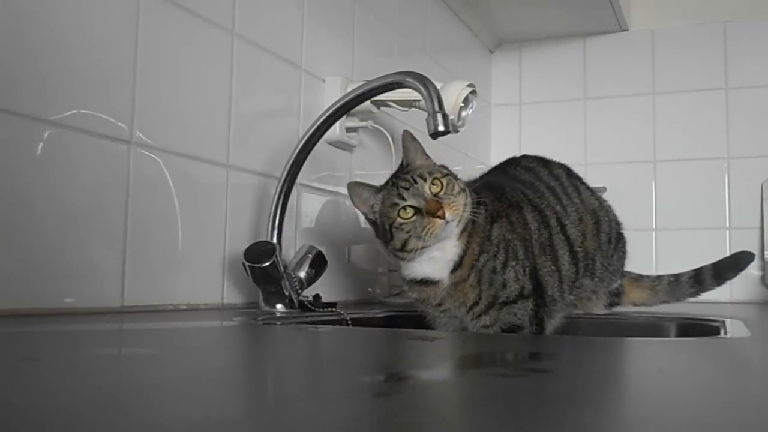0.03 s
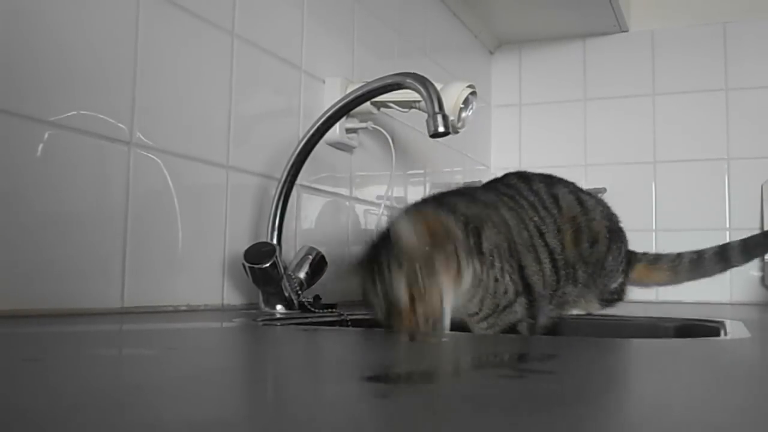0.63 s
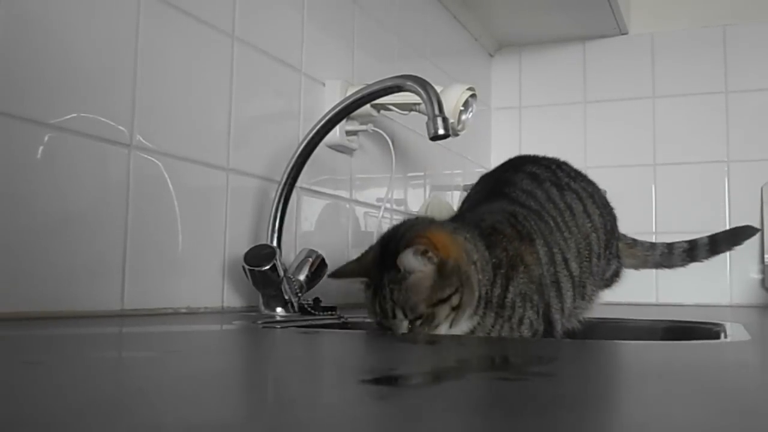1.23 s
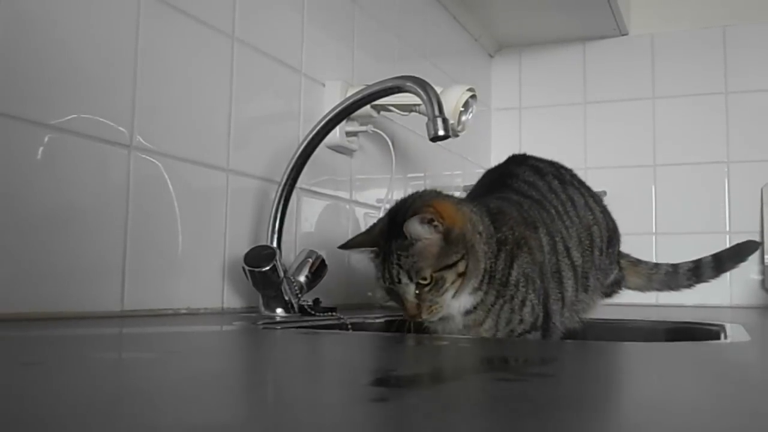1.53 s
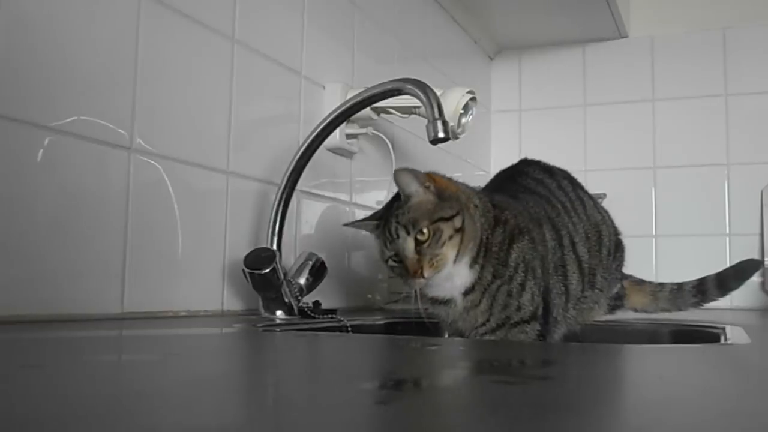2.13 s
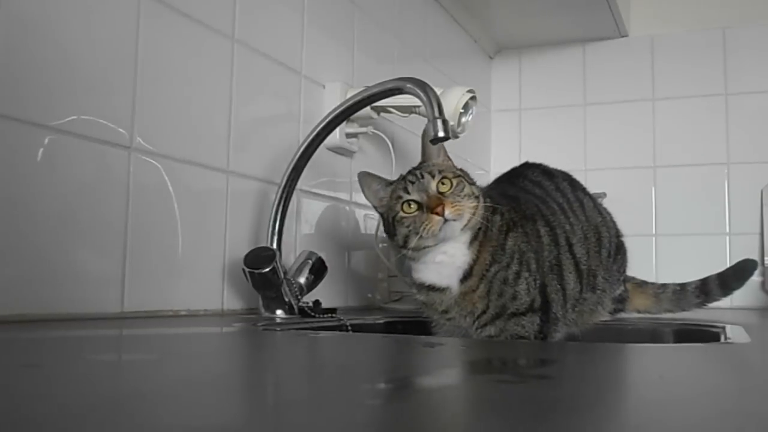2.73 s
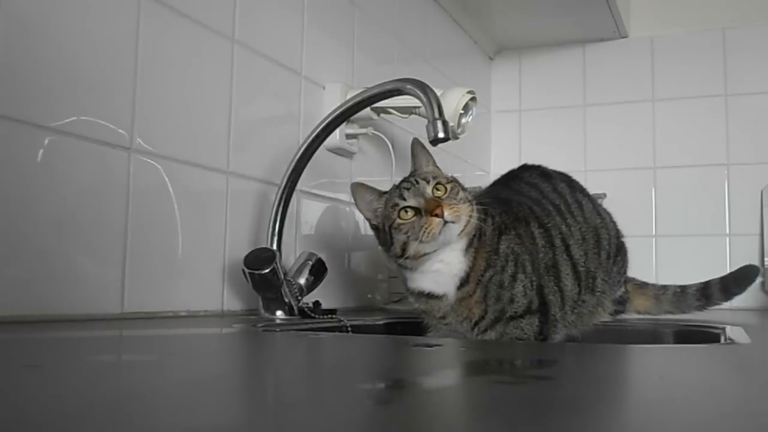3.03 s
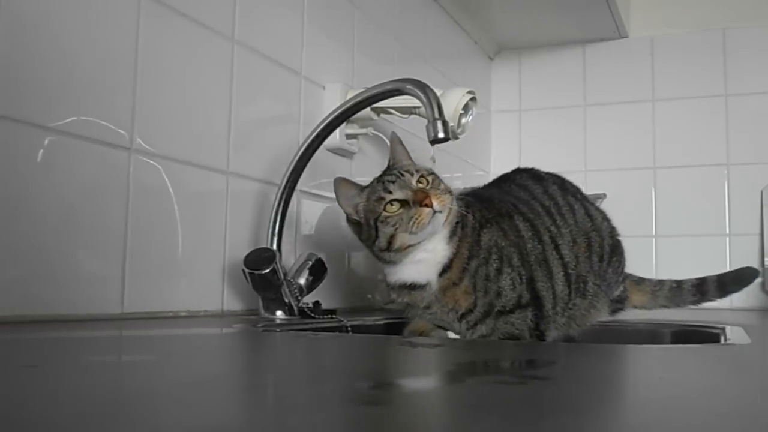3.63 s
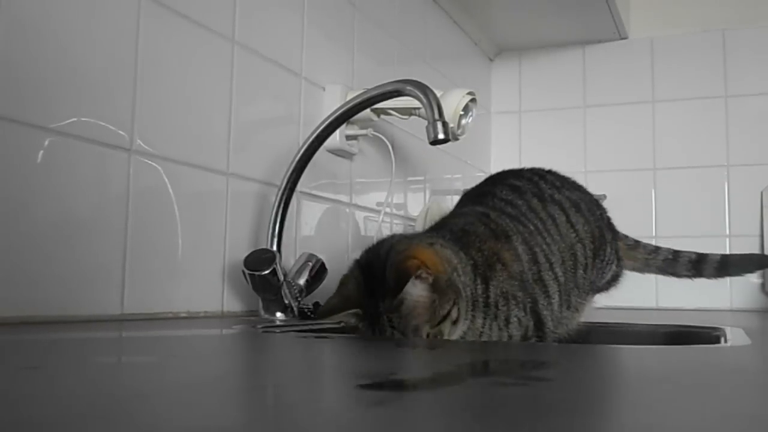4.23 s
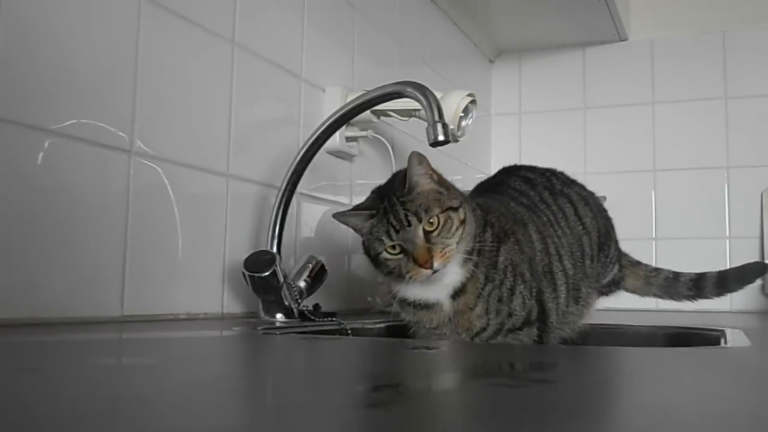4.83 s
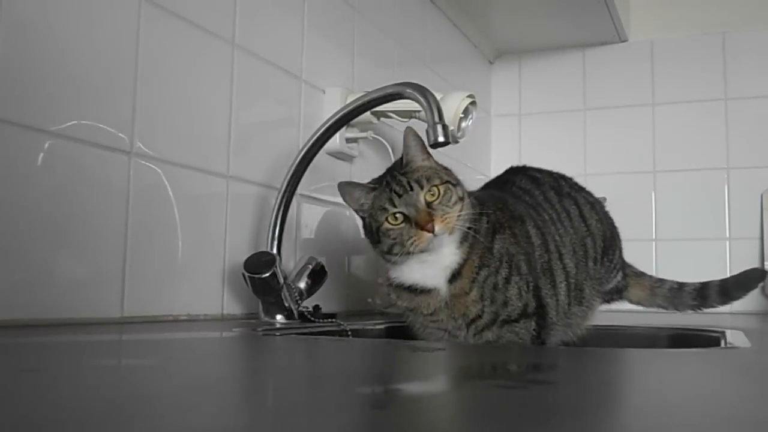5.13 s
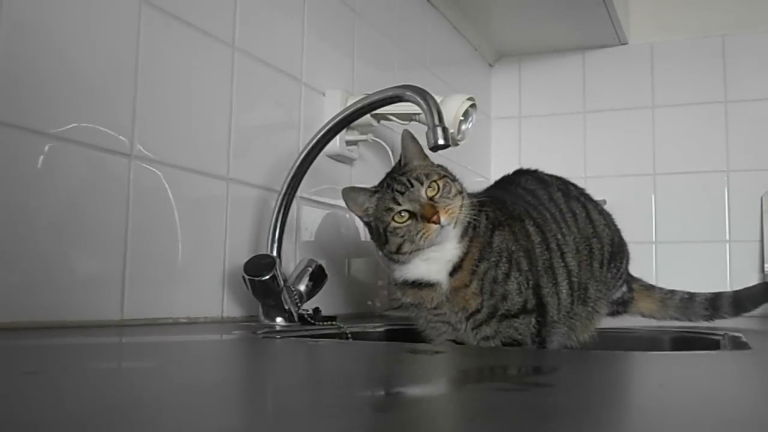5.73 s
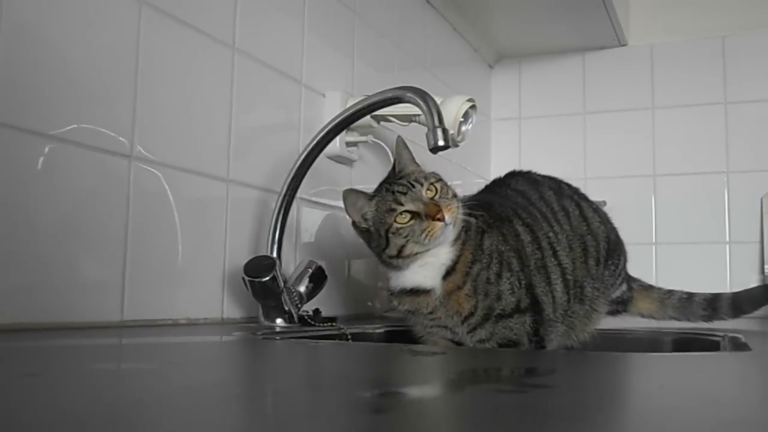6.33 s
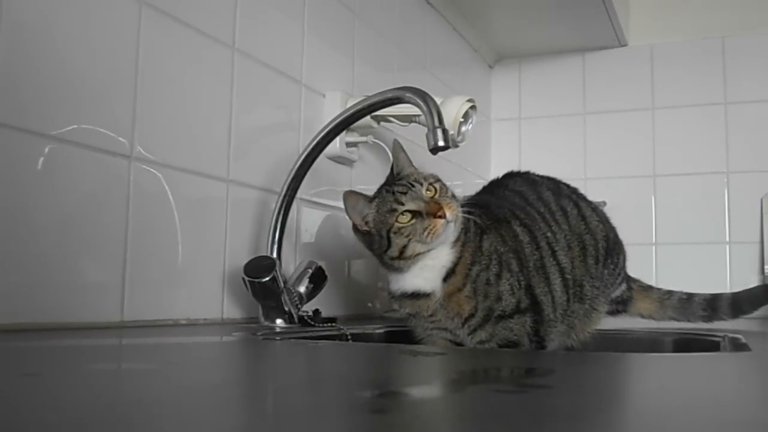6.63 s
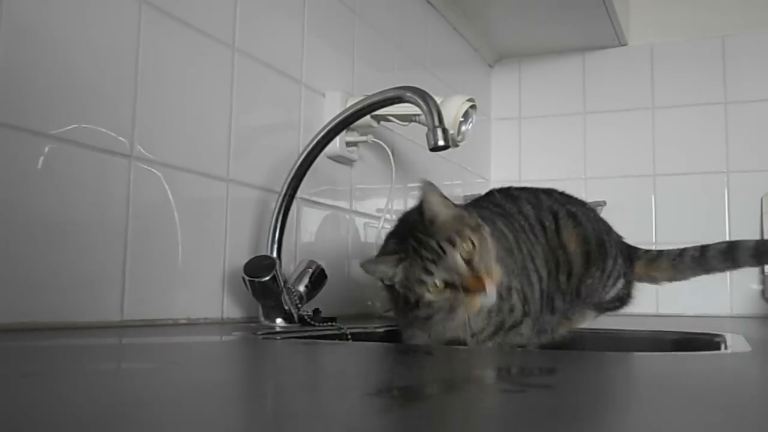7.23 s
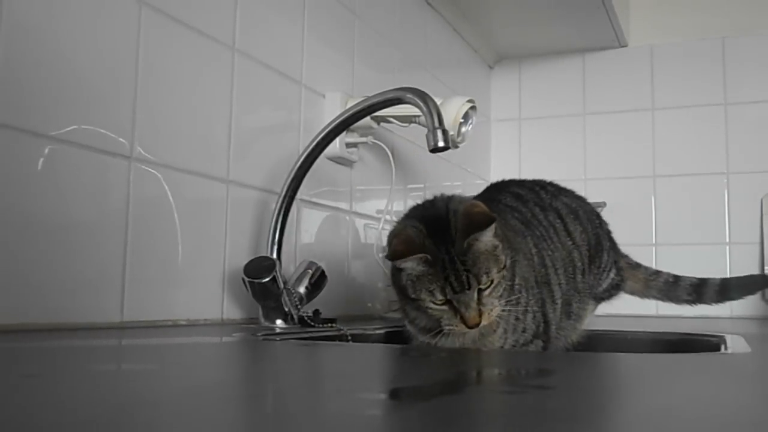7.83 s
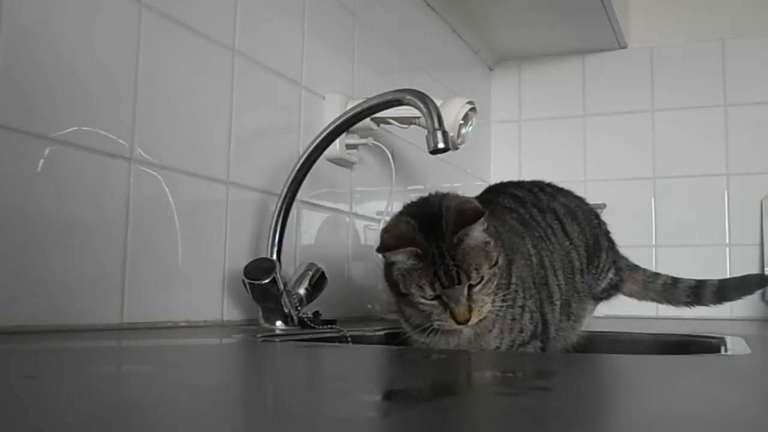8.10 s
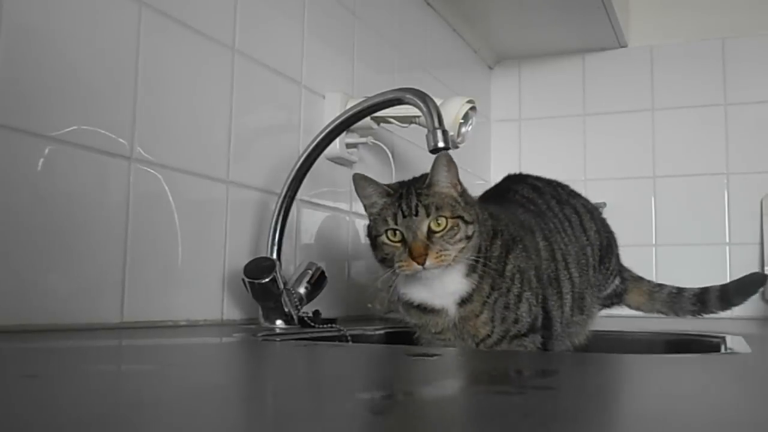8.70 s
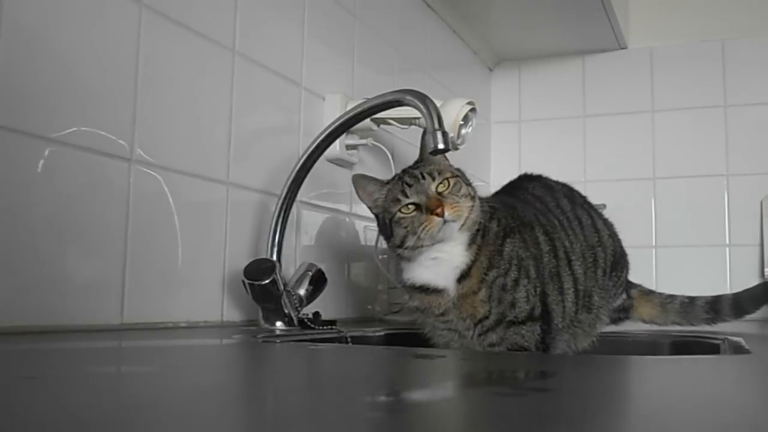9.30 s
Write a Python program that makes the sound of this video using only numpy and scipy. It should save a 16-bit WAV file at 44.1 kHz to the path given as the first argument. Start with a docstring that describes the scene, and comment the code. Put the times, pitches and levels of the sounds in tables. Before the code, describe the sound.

Quiet hiss, low room hum and a faint, high, rapidly pulsing electronic whine run throughout, heard close to a steel sink in a small tiled kitchen. At about 0.7 seconds a cat lunges: two sharp taps of drops and paws ring the thin basin briefly, followed by a small splash and a solid, hollow thump at 0.8. A softer spatter comes at 1.2, with faint scuffs. Around 3.9 seconds two more metallic taps lead straight into one bright snap of the jaws, the sharpest sound, and a low double bump. Faint rubs of fur and paws on steel follow, near 4.5, 5.3 and 6.2. At 7.3 seconds a lighter tap and a short wet slap mark the third lunge. A soft, low thump comes at 8.3, a faint tick at 8.7 and a gentle rub at 9.

```python
"""A small tiled kitchen, one microphone on the worktop close to a steel sink.
A cat lunges three times at the dripping tap: drops and paws strike the basin and ring its thin steel,
water spatters, the jaws snap shut once, and the cat's weight thumps and rubs the sink.
Behind it lie a low room hum, microphone hiss and the thin pulsing whine of the camera's electronics."""
import sys
import numpy as np
from scipy import signal
from scipy.fft import rfft, irfft
from scipy.io import wavfile
from scipy.ndimage import uniform_filter1d

SR = 44100
rng = np.random.default_rng(int(sys.argv[2]) if len(sys.argv) > 2 else 0)


def to_wav(s):
    """Save 16-bit WAV."""
    ch = np.atleast_2d(s).T  # columns
    pcm = np.round(np.clip(ch, -1, 1) * 32767)  # PCM
    wavfile.write(sys.argv[1], SR, pcm.astype(np.int16))


N = 417186
T = np.arange(N) / SR
HIT = T[:SR // 2]  # time axis of one impact [s]


def taps(load_damp_s=0.18, detune=0.008, spot_db=2):
    """Each tap ticks, plinks at the struck spot, rings the steel under the cat and pushes the panel."""
    # drops and paws on the basin: (time [s], level [dB], ring gain [dB], top of the tick [Hz],
    # plink pitch [Hz], plink gain [dB])
    strikes = [(0.7118, -15, -5, 9900, 2330, -12), (0.7696, 0, -1.5, 9900, 2650, -20.5),
               (3.8534, -7, -5.5, 8500, 5360, -25), (3.9060, -1.5, 2, 7500, 1010, -12.5),
               (7.2570, -7.5, -6.5, 6760, 1270, -13.5), (8.695, -24, -2, 6000, 1200, -12)]
    # modes of the steel basin: (frequency [Hz], level [dB], t60 [s])
    basin = [(535, -43, 0.26), (792, -35, 0.18), (902, -34.5, 0.15), (970, -35.5, 0.11), (1057, -34, 0.18),
             (1150, -23.5, 0.0087), (1250, -33, 0.077), (2160, -45, 0.092), (2274, -37, 0.039),
             (2573, -33.5, 0.053), (2730, -55, 0.12), (3340, -42, 0.046), (3605, -40, 0.087),
             (4650, -53, 0.091), (5320, -36, 0.043), (5800, -27, 0.057), (5870, -41, 0.04),
             (6240, -61, .12), (6700, -35, 0.05), (9270, -44, 0.15)]
    # spectrum of the contact tick: (frequency [Hz], level [dB])
    tick_colour = [(150, -40), (550, -6.5), (1150, -1), (1700, -8), (2500, -5.5), (4200, -7.5), (6000, -6),
                   (7600, -8), (9300, -9.5), (12000, -4.5), (16000, -24)]
    out = np.zeros(N)
    for s, db, ring_db, top_hz, plink_hz, plink_db in strikes:
        gains = undb(ring_db + spot_db * nearness(basin, plink_hz, reach_octaves=0.3))
        # the cat's load detunes and damps the modes
        loaded = [(hz * (1 + detune * rng.standard_normal()), mode_db, t60) for hz, mode_db, t60 in basin]
        steel = in_kitchen(ring(loaded, gains) * np.exp(-HIT / load_damp_s), near_db=-3, room_db=-7)
        plink_t60 = 0.0088 * (plink_hz / 1000) ** 0.75  # stiffer, higher spots ring longer
        plink = in_kitchen(ring([(plink_hz, plink_db, plink_t60)]), near_db=-19, room_db=-7)
        # a softer contact takes the top off the tick
        softness = signal.butter(4, top_hz, fs=SR, output="sos")
        contact = signal.sosfilt(softness, click(tick_colour))
        tick = in_kitchen(disperse(contact), near_db=1.5, room_db=3, near_t60=0.035)
        push = boom(panel_hz=157)
        add(out, s, undb(db) * (steel + plink + undb(1) * tick + undb(-8) * push))
    return out


def snaps(bounce_s=0.00089, bounce_db=-7):
    """Teeth meet in one hard, bright click that also reaches the microphone off the worktop."""
    # the jaws shut: (time [s], level [dB])
    bites = [(3.9174, 14)]
    # spectrum of the teeth's click: (frequency [Hz], level [dB])
    teeth_colour = [(300, -36), (1500, -33), (3500, -21), (5200, -3.5), (6600, -2.5), (7800, -4.5),
                    (9200, 1.5), (10800, -12), (13000, -20), (16000, -30)]
    teeth = click(teeth_colour)
    out = np.zeros(N)
    for s, db in bites:
        add(out, s, undb(db) * in_kitchen(teeth, near_db=-4.5, room_db=-3.5, near_t60=0.03))
        add(out, s + bounce_s, undb(db + bounce_db) * teeth)
    return out


def splashes(spread_db=4, relative_width=1.44):
    """A wet paw breaks the water film into a short burst of uneven droplets; finer ones sound higher."""
    # wet slaps of a paw: (time [s], level [dB], decay time [s], centre of the spray [Hz])
    slaps = [(0.723, -9, .007, 10000), (0.8323, -4.5, 0.0098, 3770), (1.231, -16, 0.055, 7500),
             (7.318, -6.5, 0.005, 3970)]
    # spectrum of the spray: (frequency [Hz], level [dB])
    spray_colour = [(400, -22), (1500, -8), (2600, -4), (3300, -9.5), (4100, -5.5), (5500, -2), (6600, -7),
                    (7700, -8), (10500, -11), (15000, -18)]
    out = np.zeros(N)
    for s, db, decay_s, hz in slaps:
        sizes = undb(spread_db * flutter(len(HIT), smooth_samples=30))
        droplets = resonant_noise(hz, relative_width * hz, len(HIT)) * sizes * np.exp(-(HIT / decay_s) ** 2)
        spray = signal.fftconvolve(droplets / np.linalg.norm(droplets), click(spray_colour))
        add(out, s, undb(db) * in_kitchen(spray, near_db=-4, room_db=-2, near_t60=0.033))
    return out


def thumps():
    """The cat's weight lands on soft pads and makes the sink boom."""
    # landings: (time [s], level [dB], pitch of the pushed panel [Hz])
    landings = [(0.834, 0, 900), (0.8400, 9.5, 360), (0.876, -10, 322), (3.917, -0.5, 172),
                (3.955, -3.5, 93), (8.33, -10, 121)]
    out = np.zeros(N)
    for s, db, panel_hz in landings:
        add(out, s, undb(db) * boom(panel_hz))
    return out


def boom(panel_hz, sag_hz=93, sag_db=-3.5, pad_damp_s=0.17, reach_octaves=0.29):
    """A soft push rings the modes near one panel's pitch, damped by the pad, and the whole sink sags."""
    # flexing modes of sink and worktop: (frequency [Hz], level [dB], t60 [s])
    flex = [(81.6, -29.5, 0.2), (108.4, -29, 0.17), (151, -25.5, 0.081), (188, -31.5, 0.27),
            (317.5, -31, 0.21), (395, -30.5, 0.16), (503, -36, 0.22), (554, -33, 0.22), (752, -33, 0.16),
            (815, -33, 0.12), (937, -22.5, 0.032), (1023, -34.5, 0.17)]
    panel = ring(flex, nearness(flex, panel_hz, reach_octaves)) * np.exp(-HIT / pad_damp_s)
    sag = ring(flex, nearness(flex, sag_hz, reach_octaves))
    return in_kitchen(panel + undb(sag_db) * sag, near_db=-25, room_db=-6.5)


def rubs(shudder_hz=141, shudder_stretch=1.35):
    """Paws and fur rub the steel after each lunge and when the cat shifts; the worktop shudders along."""
    # the three lunges: (time [s], gain of the footwork that follows [dB])
    lunges = [(0.71, 1), (3.88, -0.5), (7.26, -1.5)]
    # the paws slide on, then draw back: (delay [s], level [dB], length [s], centre [Hz])
    footwork = [(0.15, -54, 0.12, 670), (0.65, -57, 0.21, 1040)]
    # the crouching cat shifts or scuffs a paw: (time [s], level [dB], length [s], centre [Hz])
    shifts = [(1.170, -55, 0.044, 1190), (1.42, -54, 0.06, 1450), (5.257, -54.5, 0.14, 326),
              (6.16, -57.5, 0.1, 554), (9.03, -47, 0.17, 415)]
    slides = [(s + delay, db + gain_db, length, hz)
              for s, gain_db in lunges for delay, db, length, hz in footwork]
    out = np.zeros(N)
    for s, db, length, hz in slides + shifts:
        add(out, s, friction(db, length, hz))
        add(out, s, friction(db, length * shudder_stretch, shudder_hz))
    return out


def friction(db, length_s, hz, relative_width=0.65, grain_db=3):
    """A soft swell of friction that catches and slips."""
    size = int(length_s * SR)
    grip = flutter(SR, smooth_samples=400)[:size]
    noise = resonant_noise(hz, relative_width * hz, SR)[:size] * undb(grain_db * grip)
    return level(noise * signal.windows.tukey(size, 0.8), db)


def ring(modes, gains=1):
    """Struck modes (frequency [Hz], level [dB], t60 [s]) die away as sines of alternating sign."""
    hz, db, t60 = np.transpose(modes)
    sign = (-1) ** np.arange(len(hz))
    partials = np.sin(2 * np.pi * hz[:, None] * HIT) * undb(-60 * HIT / t60[:, None])
    return (sign * gains * undb(db)) @ partials


def nearness(modes, hz, reach_octaves):
    """How strongly each mode answers a blow at a spot of a given pitch, 0-1."""
    octaves_away = np.log2(np.array(modes)[:, 0] / hz)
    return 1 / (1 + (octaves_away / reach_octaves) ** 2)


def click(colour, size=1024):
    """The shortest causal pulse with a given spectrum."""
    gain = undb(lookup(colour, np.fft.rfftfreq(size, 1 / SR)))
    cepstrum = irfft(np.log(gain))
    cepstrum[1:size // 2] *= 2
    cepstrum[size // 2 + 1:] = 0
    return irfft(np.exp(rfft(cepstrum)))


def disperse(x, lag_s=0.001167):
    """Bending waves in sheet steel: treble outruns bass, with a delay of lag_s at 1 kHz."""
    f = np.fft.rfftfreq(len(x), 1 / SR)
    return irfft(rfft(x) * np.exp(-4j * np.pi * lag_s * np.sqrt(1000 * f)), len(x))


def in_kitchen(x, near_db, room_db, near_t60=0.13, build_s=0.0023):
    """The microphone hears the direct sound, a flurry between the basin's walls, then the tiled room."""
    # reverberation of the kitchen: (frequency [Hz], t60 [s])
    room_t60 = [(150, 0.53), (1000, 0.51), (3000, 0.41), (7000, 0.14), (12000, 0.32)]
    f = np.fft.rfftfreq(len(HIT), 1 / SR)
    noise = rfft(rng.standard_normal(len(HIT)))
    edges = np.append(0, np.geomspace(200, SR / 2 + 1, 9))
    tail = np.zeros(len(HIT))
    for lo, hi in zip(edges, edges[1:]):
        band = irfft(noise * (f >= lo) * (f < hi), len(HIT))
        tail += band * undb(-60 * HIT / lookup(room_t60, (lo + hi) / 2))
    tail *= 1 - np.exp(-HIT / build_s)
    flurry = rng.standard_normal(len(HIT)) * undb(-60 * HIT / near_t60) * (HIT > 0.0008)
    response = undb(near_db) * flurry / np.linalg.norm(flurry)
    response += undb(room_db) * tail / np.linalg.norm(tail)
    response[0] = 1  # direct sound
    return signal.fftconvolve(x, response)[:len(HIT)]


def room_tone(air_db=-43):
    """Even room rumble and microphone hiss, with a few room resonances droning in it."""
    # spectrum of rumble and hiss: (frequency [Hz], relative level [dB])
    air_colour = [(12, 0.5), (28, 1.5), (48, -11.5), (85, -5), (160, -4.5), (210, -14), (450, -16.5),
                  (520, -18), (900, -22.5), (1800, -27.5), (4000, -30), (9000, -30), (15500, -33)]
    # resonances of the room: (frequency [Hz], width [Hz], level [dB])
    drones = [(101.7, 8.1, -49.5), (156, 14.3, -55), (298.6, 27, -59.5)]
    gain = undb(lookup(air_colour, np.fft.rfftfreq(N, 1 / SR)))
    air = irfft(rfft(rng.standard_normal(N)) * gain, N)
    hum = sum(level(resonant_noise(hz, width, N), db) for hz, width, db in drones)
    return level(air, air_db) + hum


def whine(pitch_hz=1966.78, pulse_hz=14.985, loud_db=-46.5, soft_db=-56):
    """Camera electronics: faint steady harmonics, and a fourth that switches between loud and soft."""
    # steady partials of the whine: (harmonic [number], level [dB])
    harmonics = [(1, -79.5), (2, -77), (3, -72.5), (5, -66), (6, -73), (8, -78)]
    phase = 2 * np.pi * pitch_hz * T
    steady = sum(level(np.sin(k * phase), db) for k, db in harmonics)
    switched_db = np.where(T * pulse_hz % 1 < 0.5, loud_db, soft_db)
    return steady + np.sqrt(2) * undb(switched_db) * np.sin(4 * phase)


def resonant_noise(hz, width_hz, size):
    """Noise in one steep-sided resonance."""
    f = np.fft.rfftfreq(size, 1 / SR) + 1e-9
    off_centre = (f - hz ** 2 / f) / width_hz
    return irfft(rfft(rng.standard_normal(size)) / (1 + off_centre ** 2), size)


def flutter(size, smooth_samples):
    """Smoothed random wavering of unit rms."""
    return level(uniform_filter1d(rng.standard_normal(size), smooth_samples), 0)


def undb(db):
    """Decibels to gain."""
    return 10 ** (np.asarray(db) / 20)


def level(x, db):
    """Scale to an rms level."""
    return x * undb(db) / np.sqrt(np.mean(x ** 2))


def lookup(points, hz):
    """Read (frequency [Hz], value) points on a log-frequency axis."""
    f, value = np.transpose(points)
    return np.interp(np.log(hz + 1e-9), np.log(f), value)


def add(out, s, x):
    """Mix x into out at time s."""
    i = int(s * SR)
    out[i:i + len(x)] += x[:N - i]


def scene():
    """One microphone on the worktop feeds both channels."""
    mono = taps() + snaps() + splashes() + thumps() + rubs() + room_tone() + whine()
    return np.array([mono, mono])


def record(dry):
    """The recorder clips at full scale and cuts the top above 15850 Hz."""
    lowpass = signal.ellip(10, 0.1, 70, 15850, fs=SR, output="sos")
    return signal.sosfilt(lowpass, np.clip(dry, -1, 1))


dry = scene()
out = record(dry)
to_wav(out)
```